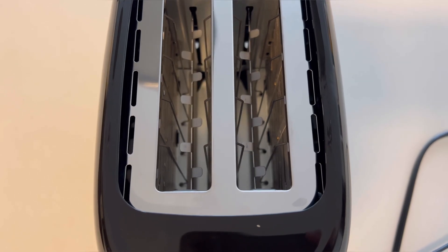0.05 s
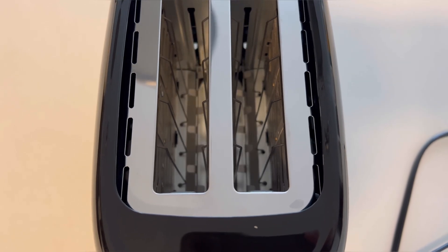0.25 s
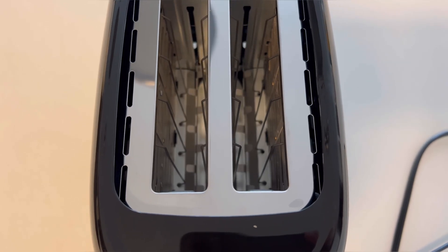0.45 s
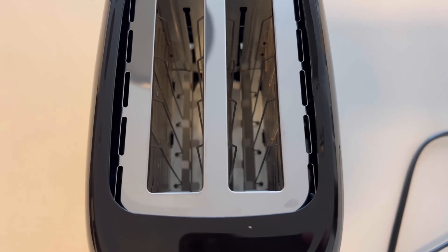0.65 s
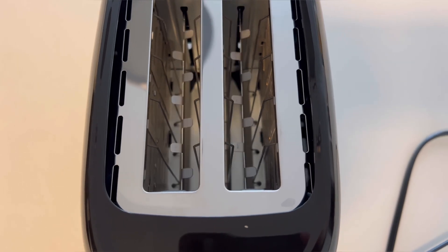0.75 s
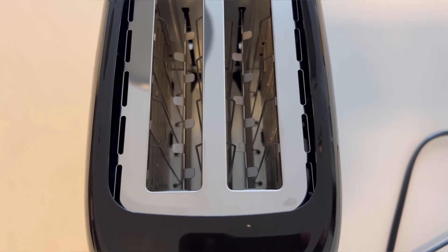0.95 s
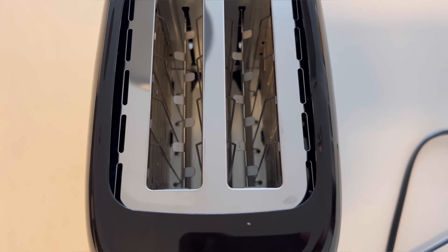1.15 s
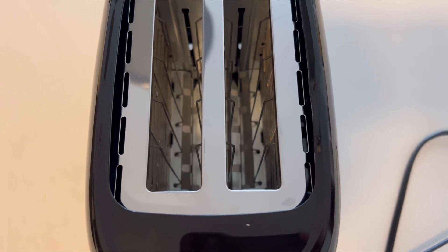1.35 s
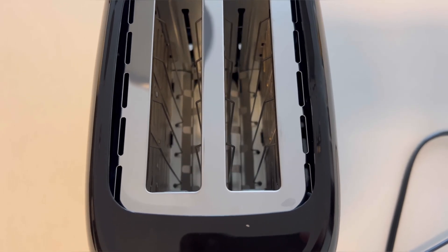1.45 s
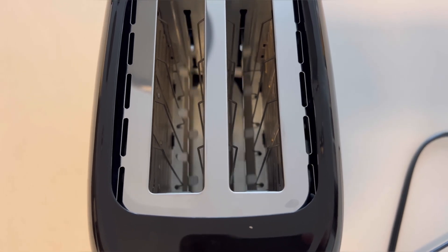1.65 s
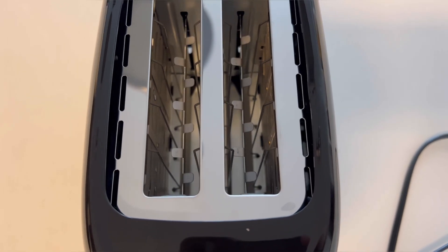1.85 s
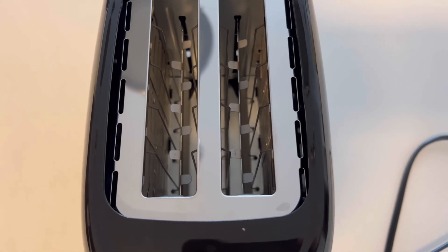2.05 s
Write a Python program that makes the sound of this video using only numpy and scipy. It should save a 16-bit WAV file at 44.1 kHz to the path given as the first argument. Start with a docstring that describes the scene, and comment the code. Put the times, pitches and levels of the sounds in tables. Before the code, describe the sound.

Toaster lever pushed down and springing back up twice, with scrapes and sharp metal clacks.

```python
"""Close up on a toaster in a small live room, over a bed of low rumble, hum and faint hiss.
The lever goes down: the carriage scrapes along its guide and clacks on the bottom stop at 0.22 s.
Let go, it springs up and hits the top stop at 0.74 s. A second, squeaky push lands at 1.36 s
and springs back at 1.70 s. Each clack rattles the racks, rings the sheet metal and thumps the case
on the counter, and leaves a short room tail."""
import sys
import numpy as np
from scipy import signal
from scipy.fft import rfft, irfft
from scipy.io import wavfile
from scipy.ndimage import uniform_filter1d

SR = 44100
rng = np.random.default_rng(int(sys.argv[2]) if len(sys.argv) > 2 else 0)


def transcribe(u):
    """Save the signal u as a 16-bit wav file named by the first command-line argument.

    u: samples, shape (n,) or (channels, n), limited to [-1, 1]; the rate is SR.
    q: integer samples, one column per channel.
    """
    v = np.clip(np.atleast_2d(u).T, -1, 1)
    q = np.round(v * 32767).astype(np.int16)
    wavfile.write(sys.argv[1], SR, q)


N = 92610
T = np.arange(N) / SR

# carriage hits on the bottom and top stops
# (t/s, clack/dB, rise/s, hold/s, rattle/dB, ring/dB, case/dB, counter/dB, counter delay/s)
BOTTOM_HITS = [(.2165, -9.5, 0.0032, 0.0023, -21.5, -57, -24, -25.5, .012),
               (1.3635, -10.5, 0.0036, 0.0033, -21.5, -52, -24.5, -27, .011)]
TOP_HITS = [(.7366, -9.5, 0.00047, 0.0017, -23, -67, -24.5, -42.5, 0.0024),
            (1.6957, -11, 0.0015, 0.0022, -16.5, -48.5, -25, -24.5, 0.033)]
# EQ of the clack at each stop and of the rattling racks (f/Hz, level/dB)
BOTTOM_EQ = [(100, -44.5), (500, -9.5), (800, -26.5), (1300, 0.5), (1500, -9), (1700, 3), (2050, -9),
             (2800, -13), (3700, -6.5), (5400, -10), (7000, -14), (8300, -3.5), (8900, -11), (9600, -6.5),
             (12300, -13), (13800, -17.5), (15700, -14.5)]
TOP_EQ = [(100, -47.5), (420, 7.5), (700, -27), (1200, -6), (2300, -1.5), (3500, -5.5), (4500, -13.5),
          (5400, -9), (6400, -6), (7600, -7.5), (8550, 5.5), (9000, -9.5), (9900, 1.5), (11200, -8.5),
          (13500, -11), (15300, -8), (16000, -14)]
RATTLE_EQ = [(350, -31), (600, -35), (660, -1.5), (1810, 0.5), (2190, 1), (2790, 0.5), (4140, -2),
             (4490, -1.5), (6310, 1), (7240, -5.5), (9630, -4), (14700, -9), (15500, -19)]
# stereo width of the clacks (f/Hz, side over mid/dB)
CLACK_WIDTH = [(400, -1.5), (1000, -4), (1700, -25.5), (2700, -6), (4500, 6), (7000, -15), (9000, -14),
               (12500, -5.5), (15500, -1)]
# modes of the sheet metal and racks (f/Hz, level/dB, t60/s)
METAL_MODES = [(952, -1.5, 0.58), (1352, -8.5, 0.35), (1608, -0.5, 0.12), (1768, -5, .3),
               (2024, -1.5, 0.88), (2368, -11.5, .2), (2704, 2, 0.239), (2781, -2.5, 0.37),
               (3127, -9.5, .3), (4698, -18.5, 0.9), (6793, -6.5, 0.13), (9150, 4, 0.085),
               (8960, -2.5, 0.17), (9848, -2.5, .16), (11500, -14, .4)]
# modes of the plastic case (f/Hz, level/dB, t60/s, phase between channels/rad)
CASE_MODES = [(174.4, -7, .18, .1), (212.4, -4, .22, .2), (242.4, 0, 0.11, .3), (304, -10.5, 0.19, 0.57),
              (365.2, -0.5, 0.073, 0.97), (430.8, -2, 0.092, 1.38), (487.7, 1, 0.12, 1.84),
              (553.7, -6.5, 0.3, 2.24)]
# fader moves of the scrape, one list per stroke down or up (t/s, mids/dB, treble/dB)
PUSH_FADES = [
    [(.108, -48, -68), (.132, -36, -55.5), (.165, -34, -50.5), (.19, -44, -38), (.212, -31, -39),
     (.221, -38, -12)],
    [(1.245, -48, -58), (1.28, -39.5, -48.5), (1.31, -33, -43), (1.342, -30.5, -39), (1.356, -32, -37.5),
     (1.367, -53, -23)],
]
RETURN_FADES = [
    [(.608, -43, -53), (.642, -48, -40.5), (.67, -44, -36.5), (.703, -40.5, -28.5), (.722, -48, -41.5),
     (.739, -43, -29)],
    [(1.575, -51.5, -82), (1.612, -37.5, -47), (1.622, -55, -39.5), (1.648, -37.5, -34.5),
     (1.67, -38, -29.5), (1.698, -46, -36)],
]
# EQ of the guide as the carriage slides down, slides up or catches (f/Hz, level/dB)
PUSH_EQ = [(410, -55), (700, -19), (839, -10.5), (1070, -13.5), (1270, 2), (1630, -1.5), (2030, -4.5),
           (2560, -10.5), (2800, -3), (4830, -19), (6500, -14), (7220, -19.5), (10800, -21.5),
           (13400, -31.5), (15500, -24)]
RETURN_EQ = [(410, -49), (700, -11), (1030, -13), (1220, 0), (1560, -11), (1670, 1), (2000, -1),
             (2460, -11), (2800, -2), (3030, -3), (4470, -13.5), (6500, -8.5), (7310, -13), (9470, -12.5),
             (15500, -21)]
CATCH_EQ = [(300, -1), (900, -14.5), (1330, -3.5), (1650, 1.5), (2200, -1), (2800, 2), (3900, -6),
            (5300, -15), (6600, -10), (9500, -2), (15500, -18)]
# small catches and rebounds (t/s, level/dB, treble tilt/dB per octave, fall/s, case/dB)
CATCHES = [(0.126, -37, -9, 0.0057, -35.5), (0.2016, -24, -5.5, 0.0066, -44),
           (0.2242, -18, 4.5, 0.0022, -24), (0.6092, -34, 1, 0.0075, -36.5), (.626, -32.5, -5, 0.0052, -40),
           (.752, -27, -2, .005, -29), (1.2493, -37.5, -5, 0.0066, -42.5), (1.2703, -44, -1, 0.0043, -47),
           (1.302, -32.5, -3, .005, -64), (1.3156, -29, -2, 0.0024, -37.5),
           (1.3413, -20, -2.5, 0.005, -34.5), (1.573, -40.5, 2, 0.0077, -44.5),
           (1.604, -26.5, -7.5, 0.002, -39), (1.639, -26, -2, 0.0029, -39),
           (1.7122, -27, -1, 0.0067, -25.5), (1.836, -34.5, 1.5, 0.0075, -37)]
# squeaks of the guide (t/s, f/Hz, level/dB)
GUIDE_SQUEAKS = [(1.268, 6530, -37), (1.340, 6600, -25)]
# decay of the room (f/Hz, t60/s)
REVERB_T60 = [(100, 0.13), (500, 0.69), (2000, 0.77), (6000, 0.76), (10000, 0.55), (15000, 0.39)]
# EQ of the room's reflections, rumble and hiss (f/Hz, level/dB)
REVERB_EQ = [(60, -14.5), (170, -3.5), (300, 6), (700, 1.5), (1800, -2.5), (4700, -0.5), (5100, -10),
             (5900, -2.5), (9500, 2), (12500, -2), (15500, 7)]
RUMBLE_EQ = [(12, -74), (20, -34.5), (35, -31), (48, -8), (67, -0.5), (86, -3), (119, -0.5), (134, -2.5),
             (156, -5.5), (240, 0), (291, -8.5), (323, -1), (369, -13), (560, -19), (700, -48.5),
             (910, -66.5), (1540, -120)]
HISS_EQ = [(350, -27.5), (600, 2), (850, 1.5), (1500, -7), (4600, -15.5), (5300, -23.5), (9000, -26),
           (12000, -45.5), (15500, -44.5)]
# partials of the background hum (f/Hz, level/dB)
HUM_PARTIALS = [(59.5, -54.5), (167, -54.5), (241, -52.5), (270, -51.5)]

SYMPATHY_DB, CLACK_SEND_DB, REVERB_DB = -10, -4, -6.5
RUMBLE_DB, HISS_DB = -41.5, -55.5


def clack(rise, hold, eq):
    """The attack: a few milliseconds of hard contacts ring the broad resonances of the stop."""
    shape = envelope(rise, hold, fall=0.0015, size=4096)
    hz = abs(np.fft.fftfreq(len(shape), 1 / SR))
    contacts = np.fft.fft(rng.standard_normal((2, len(shape))) * shape)
    mid, side = contacts / np.sqrt(uniform_filter1d(abs(contacts) ** 2, size=60, mode="wrap"))  # whiten
    width = amp(curve(CLACK_WIDTH, hz))
    stereo = np.array([mid + width * side, mid - width * side]) / np.sqrt(1 + width ** 2)
    # minimum-phase EQ keeps the transient sharp
    resonances = np.exp(np.conj(signal.hilbert(np.log(amp(curve(eq, hz))))))
    burst = np.fft.ifft(stereo * resonances).real[:, :len(shape) // 2]
    return burst * np.sqrt(2) * np.linalg.norm(shape) / np.linalg.norm(burst)


def stop_hits(hits, eq):
    """The carriage slams into a stop. Two stems: clacks, and the shaken racks, metal, case and counter."""
    clacks, shaken = np.zeros((2, 2, N))
    for s, db, rise, hold, rattle_db, ring_db, case_db, counter_db, counter_delay in hits:
        add(clacks, s, amp(db) * clack(rise, hold, eq))
        rattle = equalize(grains(0.4, spread_db=1.0, size=16384), RATTLE_EQ)
        add(shaken, s, amp(rattle_db) * rattle * envelope(rise=0.0053, hold=0, fall=0.025))
        add(shaken, s, amp(ring_db) * metal_ring())
        add(shaken, s, amp(case_db) * case_knock())
        thud = blip(hz=78, rise=0.006, fall=0.0074)
        add(shaken, s + counter_delay, amp(counter_db) * thud)
    return np.array([clacks, shaken])


def metal_ring():
    """Struck sheet metal rings in its modes, with fresh phases at every blow."""
    hz, db, t60 = np.transpose(METAL_MODES)[:, :, None]
    phase = rng.uniform(0, 2 * np.pi, hz.shape) + 1.8 * rng.standard_normal((2, len(hz), 1))
    t = T[:32768]
    modes = amp(db - 60 * t / t60) * np.sin(2 * np.pi * hz * t + phase)
    return modes.sum(1) * np.minimum(t / 0.001, 1)


def case_knock():
    """The plastic case booms briefly in its low modes, a little to the right."""
    hz, db, t60, phase_gap = np.transpose(CASE_MODES)[:, :, None]
    phase = rng.uniform(0, 2 * np.pi, hz.shape) + phase_gap * np.array([0, 1])[:, None, None]
    hz = hz * (1 + 0.035 * rng.standard_normal(hz.shape))  # each knock is slightly detuned
    db = db + 0.5 * rng.standard_normal(hz.shape)
    t = T[:16384]
    modes = amp(db - 60 * t / t60) * np.sin(2 * np.pi * hz * t + phase)
    return modes.sum(1) * np.minimum(t / 0.013, 1) * amp([[-1.5], [1.5]])


def scrapes(strokes, eq, mid_trim_db, treble_trim_db, grain_db, clump_db):
    """The sliding carriage sticks and slips in dense grains; clump_db bunches them up."""
    clumps = amp(clump_db * unit_rms(uniform_filter1d(rng.standard_normal(N), size=160)))
    slips = grains(0.72, grain_db) * clumps
    mids, treble = equalize(slips, eq, high_hz=4170), equalize(slips, eq, low_hz=4360)
    out = np.zeros((2, N))
    for stroke in strokes:
        s, mid_db, treble_db = np.transpose(stroke)
        out += mids * amp(mid_trim_db + np.interp(T, s, mid_db, -150, -150))
        out += treble * amp(treble_trim_db + np.interp(T, s, treble_db, -150, -150))
    return out


def catches():
    """The carriage catches on its guide or rebounds from a stop: a tick and a knock of the case."""
    out = np.zeros((2, N))
    for s, db, tilt_db, fall, case_db in CATCHES:
        tick = equalize(grains(0.75, size=2048), CATCH_EQ, tilt_db)
        add(out, s, amp(db) * tick * envelope(rise=0.00026, hold=0.0002, fall=fall, size=2048))
        add(out, s, amp(case_db) * case_knock())
    return out


def squeaks():
    """The guide gives tiny, high squeaks under the carriage."""
    out = np.zeros((2, N))
    for s, hz, db in GUIDE_SQUEAKS:
        add(out, s, amp(db) * blip(hz, rise=0.0044, fall=0.0025))
    return out


def sympathetic_ring(x, fall_s=0.016):
    """Rattles and scrapes keep the sheet metal ringing briefly."""
    ring = metal_ring()
    return convolve(x, ring * np.exp(-T[:ring.shape[1]] / fall_s))


def reverb(x):
    """Dense room reflections build up quickly and die soonest in the bass and the top end."""
    hz, t, bands = signal.stft(equalize(grains(0.18, size=SR), REVERB_EQ), SR, nperseg=256)
    decay = amp(-60 * t / curve(REVERB_T60, hz)[:, None])
    tail = signal.istft(bands * decay, SR, nperseg=256)[1][:, :SR]
    onset = np.clip((T[:SR] - 0.005) / 0.002, 0, 1)  # 5 ms pre-delay
    return convolve(x, tail * onset)


def room_tone():
    """The bed: low rumble, a wavering hum and faint hiss."""
    deep = equalize(grains(1.0), RUMBLE_EQ, high_hz=270) * amp([[-1.9], [-0.5]])
    upper = equalize(grains(0.64), RUMBLE_EQ, low_hz=351) * amp([[-11.5], [-8]])
    hum = np.zeros(N)
    for hz, db in HUM_PARTIALS:
        drift = 0.0095 * np.cumsum(rng.standard_normal(N))
        hum += amp(db) * np.sqrt(2) * np.sin(2 * np.pi * hz * T + drift)
    hiss = equalize(grains(0.2), HISS_EQ)
    return amp(RUMBLE_DB) * (deep + upper) + hum * amp([[-1.8], [1.5]]) + amp(HISS_DB) * hiss


def grains(correlation, spread_db=0, size=N):
    """Stereo noise, partly shared by both channels; spread_db makes it gritty."""
    mid, side = rng.standard_normal((2, size))
    strength = amp(spread_db * np.minimum(rng.exponential(1, size), 5))
    shared = np.clip(correlation, -0.99, 0.99)
    return strength * (np.sqrt(1 + shared) * mid + np.sqrt(1 - shared) * side * np.array([[1], [-1]]))


def blip(hz, rise, fall):
    """A short sine pulse, panned centre."""
    tone = np.sqrt(2) * np.sin(2 * np.pi * hz * T) * envelope(rise, 0, fall, size=N)
    return np.array([tone, tone])


def envelope(rise, hold, fall, size=16384):
    """Linear attack, hold and exponential release, in seconds."""
    t = T[:size]
    return np.minimum(t / rise, 1) * np.exp(-np.maximum(t - rise - hold, 0) / fall)


def equalize(x, eq, tilt_db=0, low_hz=0, high_hz=SR):
    """Applies an EQ curve, a tilt per octave above 1 kHz and soft band edges, then normalizes."""
    hz = np.fft.rfftfreq(x.shape[-1], 1 / SR) + 1
    gain = amp(curve(eq, hz) + tilt_db * np.log2(np.maximum(hz, 1000) / 1000))
    rolloff = np.sqrt((1 + (low_hz / hz) ** 8) * (1 + (hz / high_hz) ** 8))
    return unit_rms(irfft(rfft(x) * gain / rolloff, x.shape[-1]))


def convolve(x, impulse):
    """Plays x through a normalized stereo impulse response."""
    return signal.fftconvolve(x, impulse / np.linalg.norm(impulse[0]), axes=1)[:, :N]


def curve(points, hz):
    """Reads a table on a log-frequency axis."""
    f, value = np.transpose(points)
    return np.interp(np.log(hz + 1), np.log(f + 1), value)


def add(mix, s, sound):
    """Mixes a stereo sound in at time s."""
    part = mix[:, max(round(s * SR), 0):][:, :sound.shape[1]]
    part += sound[:, :part.shape[1]]


def amp(db):
    """Decibels to gain."""
    return 10 ** (np.asarray(db) / 20)


def unit_rms(x):
    """Scales to rms 1."""
    return x / np.sqrt(np.mean(x ** 2) + 1e-20)


def scene():
    """Toaster, reverb and room tone; the clacks beam up out of the slots and get a lower reverb send."""
    clacks, body = stop_hits(BOTTOM_HITS, BOTTOM_EQ) + stop_hits(TOP_HITS, TOP_EQ)
    body += catches() + squeaks()
    body += scrapes(PUSH_FADES, PUSH_EQ, mid_trim_db=-2, treble_trim_db=3, grain_db=0.5, clump_db=2)
    body += scrapes(RETURN_FADES, RETURN_EQ, mid_trim_db=0.5, treble_trim_db=-1, grain_db=1.5, clump_db=0)
    body += amp(SYMPATHY_DB) * sympathetic_ring(body)
    reflections = amp(REVERB_DB) * reverb(body + amp(CLACK_SEND_DB) * clacks)
    return clacks + body + reflections + room_tone()


def record(dry):
    """Master chain: a clip at full scale, then a steep low-pass at 15.9 kHz."""
    lowpass = signal.firwin(511, 15900, window=("kaiser", 9), fs=SR)
    return signal.oaconvolve(np.clip(dry, -1, 1), lowpass[None], "same")


dry = scene()
out = record(dry)
transcribe(out)
```